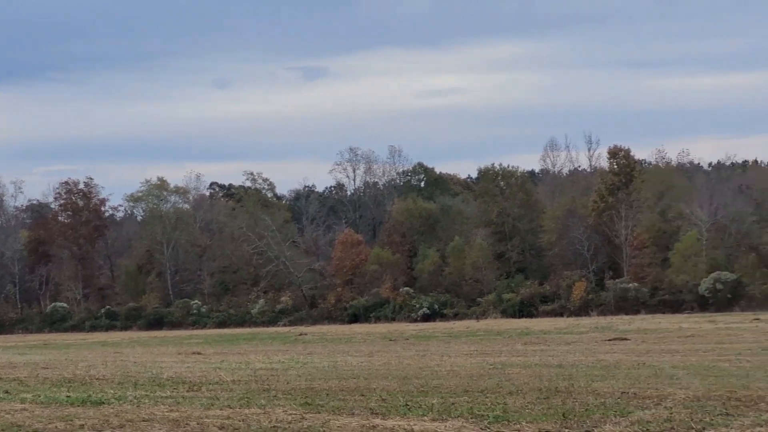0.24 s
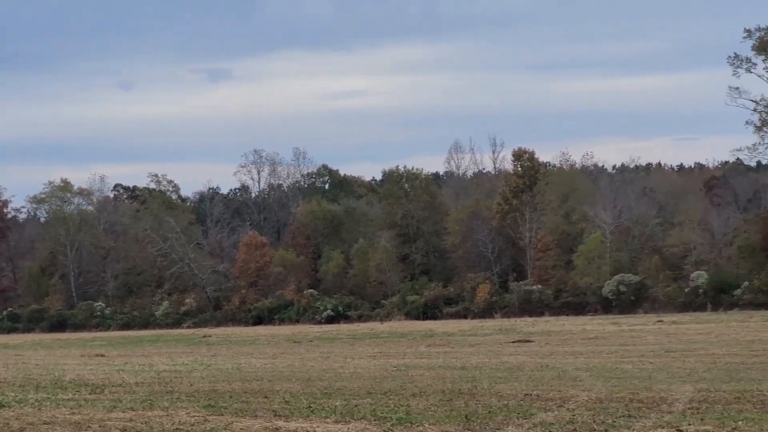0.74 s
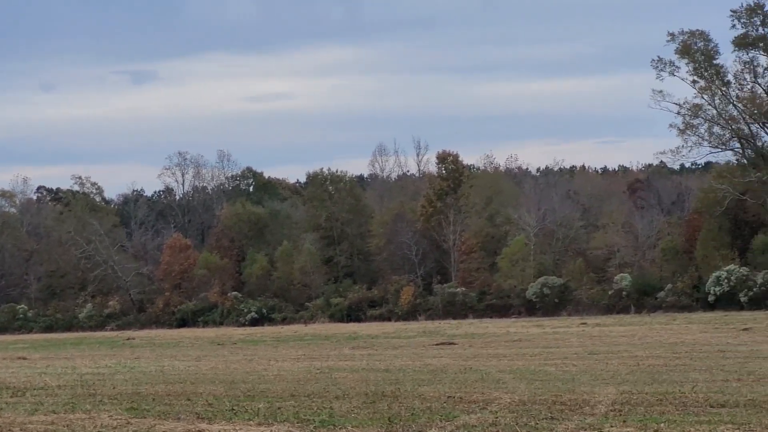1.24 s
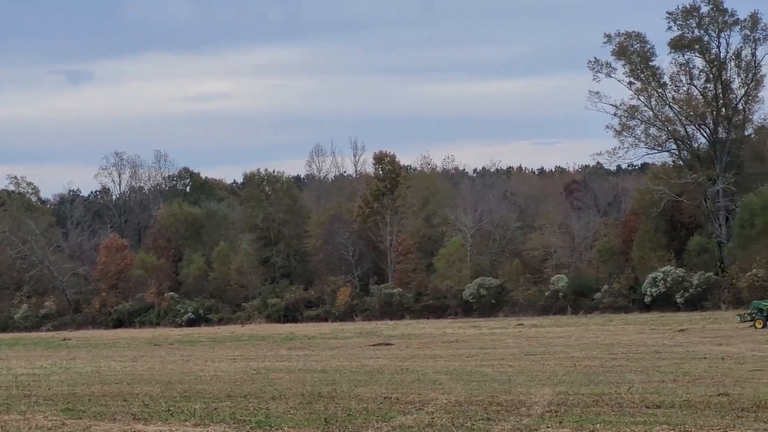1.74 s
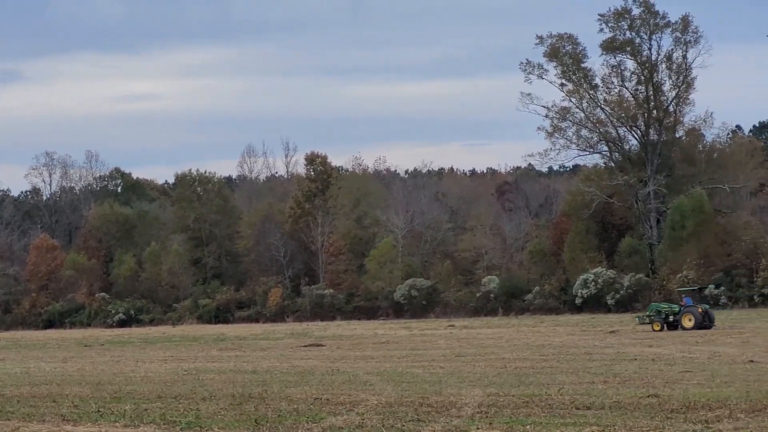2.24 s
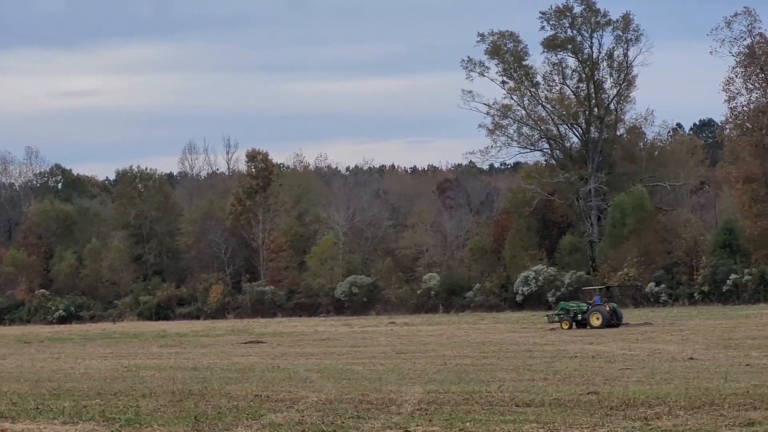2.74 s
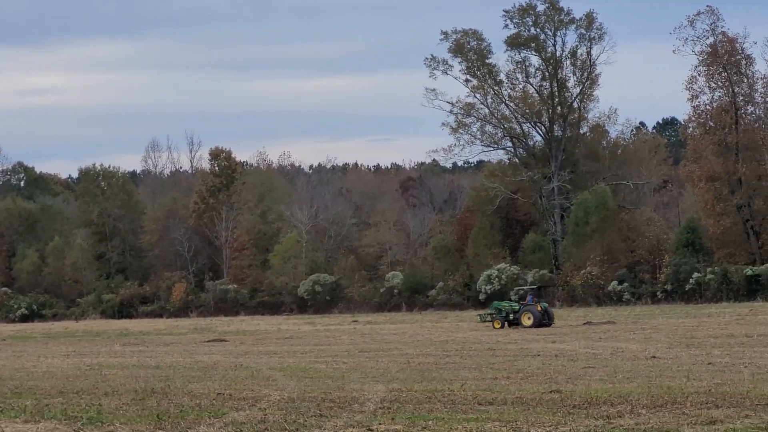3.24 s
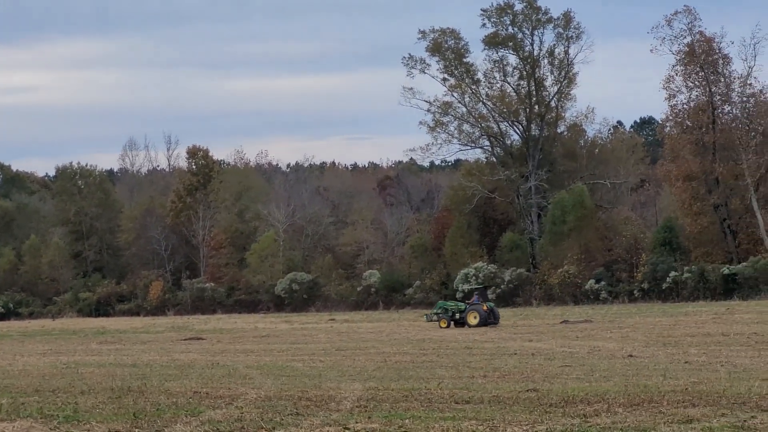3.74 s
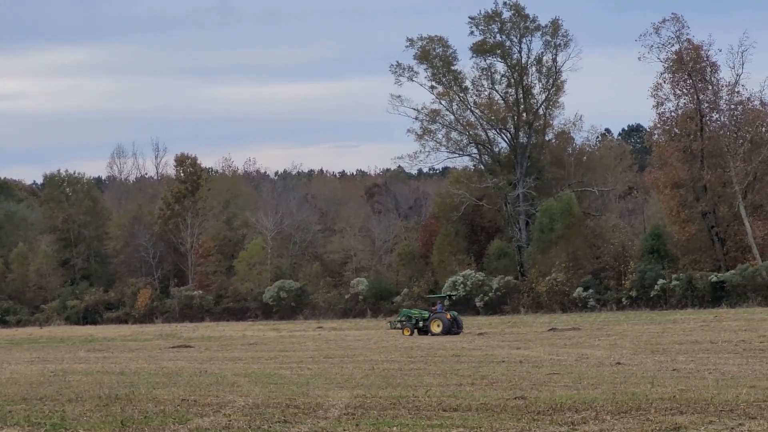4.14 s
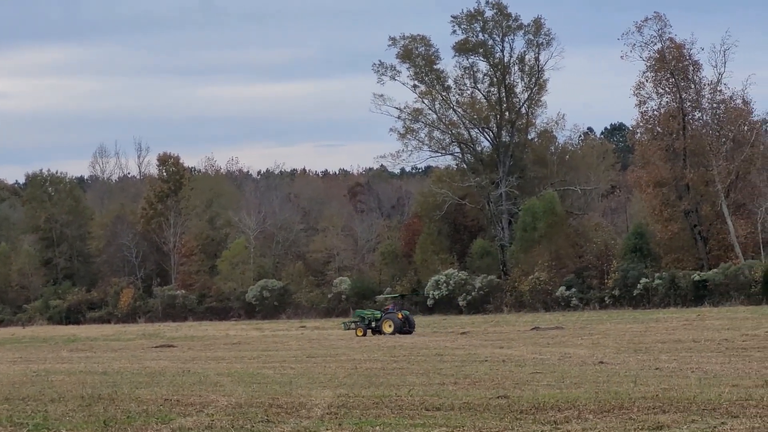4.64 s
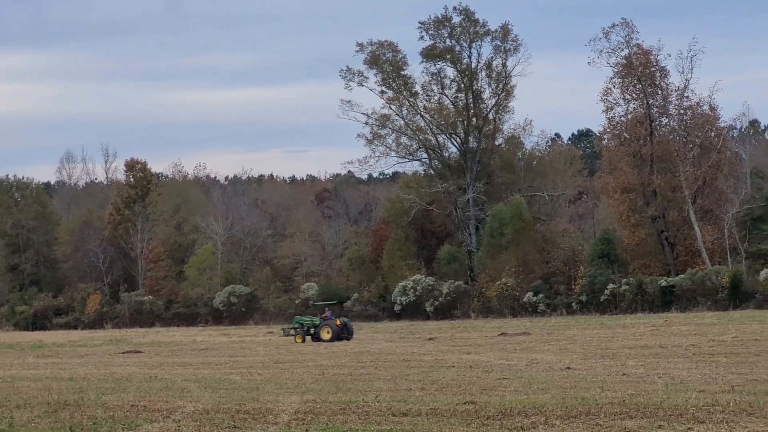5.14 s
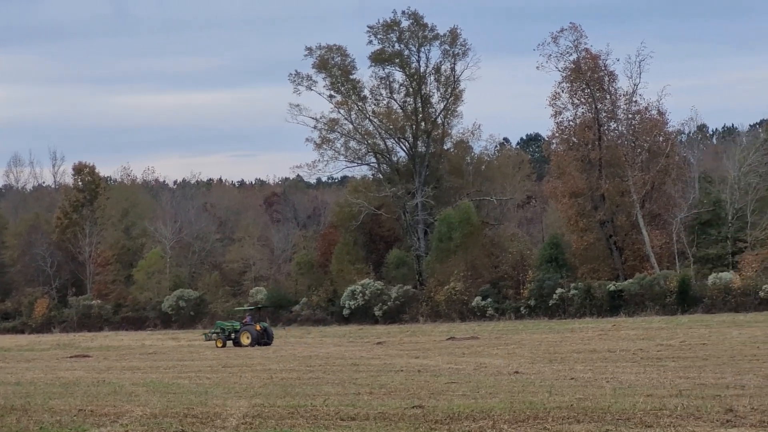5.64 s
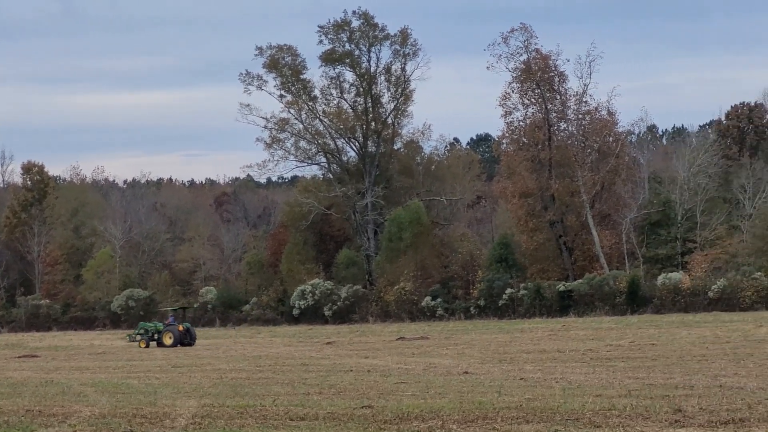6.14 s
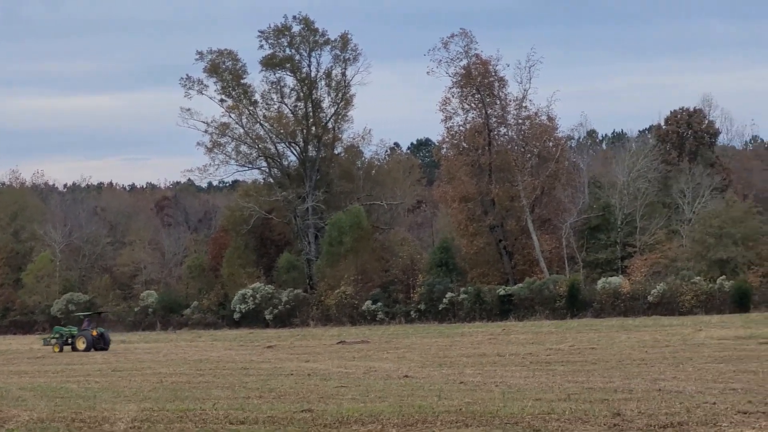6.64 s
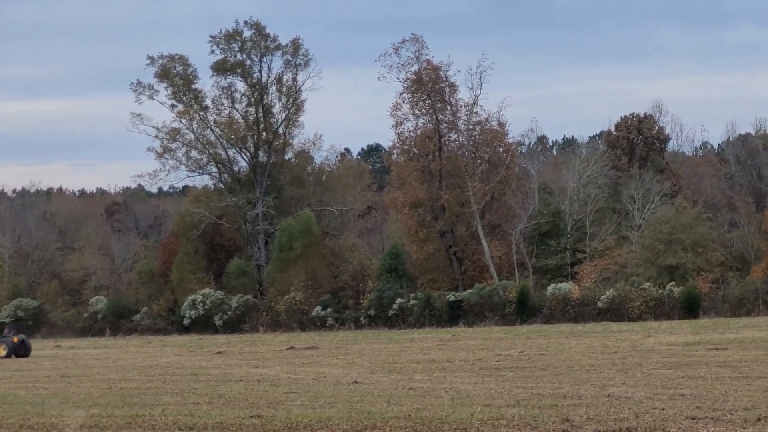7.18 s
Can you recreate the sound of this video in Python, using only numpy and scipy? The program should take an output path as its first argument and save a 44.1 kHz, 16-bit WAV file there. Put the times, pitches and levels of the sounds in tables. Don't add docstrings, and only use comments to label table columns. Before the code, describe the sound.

A distant tractor drones steadily over an open field while dry stubble crunches and snaps nearby, then a cow gives one short closed-mouth low.

```python
import sys
import numpy as np
from scipy import signal
from scipy.fft import rfft, irfft, next_fast_len
from scipy.io import wavfile
from scipy.ndimage import map_coordinates

SR = 44100
rng = np.random.default_rng(int(sys.argv[2]) if len(sys.argv) > 2 else 0)


def put_to_file(sound):
    columns = np.atleast_2d(sound).T
    safe = np.clip(columns, -1, 1)
    whole_steps = np.round(safe * 32767)
    wavfile.write(sys.argv[1], SR, whole_steps.astype(np.int16))


def attenuation_scalar(level_db):
    decades = np.asarray(level_db, float) / 20
    return 10 ** decades


N = 326781
T = np.arange(N) / SR

# (time [s], firing pitch [Hz], firing level [dB])
TRACTOR = [(0.0, 97.1, -39), (0.12, 100.6, -47.5), (0.27, 98.9, -37.5), (0.8, 99.16, -45.5),
           (0.95, 100.4, -40.5), (1.17, 97.2, -42), (1.21, 98.15, -50), (1.52, 97.4, -41),
           (2.37, 96.95, -44), (2.5, 97.7, -47.5), (2.7, 97.1, -40), (3.0, 97.3, -43), (3.71, 97.15, -40.5),
           (5.82, 97.53, -43.5), (6.1, 96.9, -45.5), (6.56, 97.66, -42.5), (6.8, 98.96, -43),
           (7.41, 98.7, -43.5)]
# (multiple of firing pitch, level [dB])
CRANK_ORDERS = [(.5, -49.5), (.64, -58), (.75, -56.5), (1.25, -65.5), (1.5, -60), (2.01, -70.5),
                (2.4, -57.5)]
# (frequency [Hz], density [dB per Hz])
RUMBLE_COLOUR = [(18, -38), (30, -19), (80, -0.5), (104, -8.5), (124, -11), (145, -6.5), (177, -12),
                 (248, -11), (305, -18), (427, -37), (480, -44), (620, -93), (1060, -120)]

# (frequency [Hz], density [dB per Hz])
FIELD_COLOUR = [(240, -58.5), (400, -18), (715, -8), (817, -7.5), (934, -7.5), (1220, -3), (2150, -4),
                (2420, -3), (2650, -1), (2890, -8), (4390, -4.5), (5570, -14.5), (6500, -17), (8000, -14),
                (8700, -48), (10200, -30.5), (14000, -36.5)]
# (centre [Hz], width [Hz], level [dB])
FIELD_BANDS = [(854, 69, 8.5), (1474, 150, 4), (2426, 167, 10.5), (3180, 440, 6.5), (4355, 100, 7)]
# (frequency [Hz], correlation)
FIELD_ALIKE = [(100, 0.89), (350, 0.96), (700, 0.63), (1500, 0.39), (2200, 0.16), (3300, 0.86),
               (4300, 0.21), (6000, 0.033), (7500, 0.034), (15000, 0.11)]

# (time of full weight [s], level [dB], rise [s], t60 [s])
STEPS_NEAR = [(0, -49, .02, 0.57), (.14, -34, .038, 0.25), (.19, -42.5, 0.023, 0.92),
              (.3, -48, 0.032, 0.27), (.51, -53, 0.022, 0.59), (.67, -47.5, 0.047, 0.89),
              (.753, -32.5, 0.029, 0.32), (.86, -42, 0.013, 0.49), (1.045, -46.5, .01, 0.65),
              (1.16, -42, 0.047, 0.26), (1.375, -51, 0.013, 0.33), (1.43, -49.5, 0.027, 1.1),
              (1.497, -33, 0.034, 0.14), (1.74, -51, 0.031, 0.61), (1.87, -48.5, 0.029, 0.17),
              (2.115, -53.5, 0.035, 0.24), (2.19, -57.5, .003, 0.17)]
STEPS_MID = [
    (3.885, -48.5, 0.015, 0.22),
    (3.975, -45, 0.05, 1),
    (4.044, -41.5, 0.054, 0.38),
    (4.156, -56.5, 0.022, 0.54),
]
STEPS_FAR = [
    (5.542, -51, 0.041, 2.5),
    (5.7, -71, .05, 1),
    (6.318, -43, 0.012, 0.082),
    (6.416, -59, .015, 0.43),
    (6.634, -48, 0.038, 0.38),
    (6.728, -48, 0.015, 0.35),
    (6.88, -53.5, 0.039, 0.507),
    (6.952, -38.5, 0.044, 0.52),
    (7.09, -58, 0.024, 1.04),
    (7.332, -51.5, 0.0121, 0.35),
]
# (frequency [Hz], density [dB per Hz])
STALKS_NEAR = [(260, -1), (450, -23), (789, -11.5), (1050, -16), (1300, -4), (1740, -13.5), (1980, -0.5),
               (3090, -1), (3370, -1), (3670, -2.5), (4900, -9.5), (5740, -16.5), (7440, -19.5),
               (12800, -42.5), (14000, -62)]
STALKS_MID = [(350, -35), (600, -15.5), (845, -12.5), (1510, -10.5), (1610, -1.5), (1820, -14), (2020, -6),
              (2490, -4.5), (2700, -6), (3950, -0.5), (6100, -19), (7940, -16), (14000, -59)]
STALKS_FAR = [(260, -62), (450, -26), (800, -15), (964, -21), (1320, -10.5), (1740, -11), (2100, -3),
              (2490, -7), (2920, -4), (4120, -4), (7880, -28.5), (11600, -36), (14000, -72)]
# (centre [Hz], width [Hz], level [dB])
HOLLOW_NEAR = [(784, 27, 11.5), (1638, 67, 13.5), (1910, 100, 5), (2770, 21, 12), (3050, 18, 12.5),
               (3705, 98, 8), (4930, 180, 12.5), (7500, 2100, 4.5)]
HOLLOW_FAR = [(820, 100, 3), (2360, 100, 3), (2900, 500, 6), (3330, 150, 3), (3770, 90, 4), (4680, 100, 3)]
# (time [s], peak level [dB], ring [Hz])
SNAPS = [(0.03, -36, 3100), (0.107, -32, 3830), (0.1221, -27, 1970), (0.124, -26, 3780),
         (0.1414, -25.5, 3180), (0.198, -35, 3700), (0.299, -33, 3000), (0.7348, -37, 1920),
         (0.7403, -19.5, 3010), (0.7544, -22, 3730), (0.766, -31, 3000), (0.783, -25, 3150),
         (0.799, -34, 3600), (0.814, -28, 2900), (0.858, -29.5, 2620), (1.3713, -46, 2012),
         (1.4666, -36, 3564), (1.4738, -33.5, 2830), (1.4927, -37, 2256), (1.501, -37, 3570),
         (1.524, -55, 3020), (1.739, -48, 3060), (1.8644, -36.5, 3500), (2.109, -37.5, 3050),
         (2.1879, -35, 3566), (3.875, -39, 4180), (3.949, -36, 4700), (3.9706, -33, 3930),
         (3.9935, -37.5, 3870), (4.013, -32, 3990), (4.0481, -39, 3900), (4.074, -40.5, 3936),
         (4.117, -46, 2896), (4.1615, -41, 3450), (4.1758, -37, 3520), (4.2, -42, 3900),
         (4.804, -38.5, 2908), (5.7136, -44, 2390), (6.313, -40, 2770), (6.633, -34, 2860),
         (6.7251, -33.5, 2800), (6.913, -30, 3284), (6.935, -30, 2770), (6.949, -30, 3000),
         (6.958, -31, 2900), (6.978, -34, 3006), (7.3282, -35, 3350)]
# (time [s], level [dB])
THUDS = [
    (0.081, -37),
    (0.741, -49),
    (4.485, -47),
    (5.527, -31),
    (6.93, -44),
]
# (time [s], length [s], level [dB], low edge [Hz], high edge [Hz])
SWEEPS = [
    (4.77, 0.16, -68, 3000, 14000),
    (5.716, 0.24, -52.5, 970, 2700),
    (7.405, 0.034, -40.5, 300, 1200),
    (5.504, 0.45, -74, 5986, 12900),
    (5.685, 0.037, -64, 5000, 13800),
    (6.48, 0.02, -64.5, 4000, 12900),
    (6.57, 0.041, -71, 6000, 14000),
]
# (time [s], peak level [dB], pitch [Hz], t60 [s])
CHINKS = [
    (.503, -40, 4820, .07),
    (1.04, -32, 4830, .09),
    (1.065, -38, 4830, .07),
    (1.152, -37, 4830, .08),
    (1.495, -36, 4830, .1),
    (1.598, -39, 4750, .08),
    (2.886, -42, 4900, .02),
    (3.625, -43, 5000, .02),
    (5.188, -43, 4700, .02),
]

# (time [s], length [s], pitch [Hz], rise [Hz], level [dB])
CHIPS = [
    (2.505, .075, 5580, 170, -58),
    (3.345, .07, 5280, 0, -49),
    (3.55, .05, 5300, 0, -51),
    (3.785, .08, 5270, 40, -50),
]

# (time [s], effort [dB], air through the nose [dB])
LOW = [
    (3.32, -62, -33),
    (3.362, -44, -8.5),
    (3.44, -46, -1),
    (3.55, -36.5, -7),
    (3.68, -33, -10.5),
    (3.82, -32, -10),
    (3.89, -29.5, -13.5),
    (3.912, -37.5, -11),
    (3.945, -72, -9),
]
# (time [s], pitch [Hz])
PITCH = [
    (3.33, 113.5),
    (3.4, 119.8),
    (3.492, 123),
    (3.59, 124),
    (3.63, 125.9),
    (3.722, 128.6),
    (3.812, 129),
    (3.862, 127.4),
    (3.89, 123),
    (3.925, 112),
]
# (centre [Hz], width [Hz], level [dB])
CHEST = [(233.6, 91, 21), (515, 40, -30)]
NOSE = [(872, 115, 0)]
SINUS = [(1137, 154, 0)]
PALATE = [(1480, 233, 0)]
BROW = [(1712, 170, 0)]
HEAD = [(1962, 165, 7.5), (2390, 142, 0), (2556, 260, 1)]
# (level [dB], opening [dB per s], gain at a push [dB])
UPPER = [
    (-4.5, 15, -4),
    (-4.5, 6, 4),
    (-10.5, 22.5, -12),
    (-5.5, -1, 6.5),
]
# (centre [Hz], width [Hz], level [dB])
NASAL_BUMPS = [(1063, 47, 5), (1240, 78, -3)]

# (frequency [Hz], left minus right [dB])
FIELD_PORTS = ([(0, 0), (1100, -1.6), (1700, 3), (2200, 9), (2700, 9.5), (4000, 26), (5100, 28),
                (7500, 40.5), (9000, 44)], [(500, 0), (770, -2.5), (1500, -1.5), (2740, -4), (4190, 0),
                (6410, 0), (9810, 1), (15000, 4.5)])
NEAR_PORTS = ([(0, 0), (1100, .6), (1300, -.3), (1700, 1), (1900, -.5), (2300, .4), (2600, 6), (4300, 26),
               (5200, 30), (9000, 44)], [(60, .5), (330, -1), (500, 1.5), (770, -2.5), (1400, -.5),
               (2740, -2.5), (4190, 1.5), (9810, 2.5), (15000, 7.5)])
MID_PORTS = ([(0, 0), (2000, 1), (2600, 6), (4300, 26), (5200, 30), (9000, 44)], [(380, -.5), (700, -4),
              (1290, 0), (2380, -1.5), (4400, 2.5), (8120, 1), (15000, 6.5)])
FAR_PORTS = ([(0, 0), (1000, .6), (1700, 3), (1900, 1.7), (2600, 9.4), (4400, 28), (5200, 30), (9000, 40)],
              [(330, 0), (500, 2), (770, -3.5), (1170, -1), (2740, -5), (6410, 2.5), (9810, 1.5),
              (15000, 9)])
COW_PORTS = ([(0, 0), (400, .5), (800, 1.8), (1100, 3), (1600, 5), (1800, 4.4), (2200, 6.6), (3000, 7.5)],
              [(300, .5), (700, 3), (900, -1), (1150, -9), (1500, -4), (1650, -1), (1900, -12), (2200, -6),
              (2500, -5)])


def unit(x):
    return x / np.sqrt(np.mean(x ** 2) + 1e-20)


def along(points, hz):
    f, v = np.transpose(points)
    return np.interp(np.log(hz + 1), np.log(f + 1), v)


def curves(rows):
    s, *cols = np.transpose(rows)
    return [np.interp(T, s, c) for c in cols]


def during(rows, fade):
    return np.clip(np.minimum(T - rows[0][0], rows[-1][0] - T) / fade + 1, 0, 1)


def wobble(rate):
    return map_coordinates(rng.standard_normal(int(N * rate / SR) + 4), [T * rate])


def add(out, s, x):
    spot = out[..., round(s * SR):][..., :x.shape[-1]]
    spot += x[..., :spot.shape[-1]]


def filtered(x, response):
    m = next_fast_len(N + SR // 4)
    return irfft(rfft(x, m) * response(np.fft.rfftfreq(m, 1 / SR)), m)[..., :N]


def resonant(modes):
    def response(f):
        total = 0
        for k, (c, w, db) in enumerate(modes):
            total = total + (-1) ** k * attenuation_scalar(db) * 1j * f * w / (c * c - f * f + 1j * f * w)
        return total
    return response


def bumps(bands):
    return lambda f: attenuation_scalar(sum(db / (1 + (2 * (f - c) / w) ** 2) for c, w, db in bands))


def ports(x, where):
    lead, balance = where

    def half(hz):
        return attenuation_scalar(along(balance, hz) / 2) * np.exp(.5j * np.interp(hz, *np.transpose(lead)))
    return filtered(x, lambda hz: np.array([half(hz), 1 / half(hz)]))


def pair(noise, alike):
    def mid_and_side(hz):
        turn = np.arccos(np.clip(alike(hz), -1, 1)) / 2
        return np.array([np.cos(turn), np.sin(turn)])
    mid, side = filtered(noise, mid_and_side)
    return np.array([mid + side, mid - side])


def far_noise():
    return pair(rng.standard_normal((2, N)), lambda hz: along(FIELD_ALIKE, hz))


def tractor():
    firing, firing_db = curves(TRACTOR)
    phase = 2 * np.pi * np.cumsum(firing) / SR
    tone = attenuation_scalar(firing_db + 3.5 + 0.85 * wobble(9)) * np.sin(phase + 0.17 * wobble(9.7))
    for k, db in CRANK_ORDERS:
        tone += attenuation_scalar(db + 0.5 + 1.5 * wobble(6)) * np.sin(k * phase + 0.77 * wobble(5))
    rumble = unit(filtered(far_noise(), lambda hz: attenuation_scalar(along(RUMBLE_COLOUR, hz))))
    throb = 1 + 0.18 * np.cos(phase / 4)
    return tone + attenuation_scalar(-47.0 + 1.12 * wobble(8.3)) * throb * rumble


def field():
    start_db, fade_db_per_s = -51, 0.44
    air = unit(filtered(far_noise(), lambda hz: attenuation_scalar(along(FIELD_COLOUR, hz)) * bumps(FIELD_BANDS)(hz)))
    unrest_db = .4 * wobble(8) + .9 * wobble(40)
    return ports(attenuation_scalar(start_db - fade_db_per_s * T + unrest_db) * air, FIELD_PORTS)


def insects():
    chorus_db, hushed_db, recovery_s = -81, -22, 1.8
    beat = 2 * np.pi * np.cumsum(46.8 + .3 * wobble(1)) / SR
    strokes = (.5 + .5 * np.cos(beat)) ** 1.5 * (.6 + .4 * np.cos(4 * beat))
    wing = resonant([(7600, 420, 0)])
    trill = unit(filtered(strokes * rng.standard_normal(N), lambda f: wing(f) ** 2))
    hiss = unit(filtered(rng.standard_normal((2, N)), lambda f: resonant([(15200, 1100, 0)])(f) ** 3))
    hiss_db = chorus_db + hushed_db * np.exp(-T / recovery_s) + 2.2 * wobble(60) + 5 * np.cos(beat)
    chorus = attenuation_scalar(hiss_db + [[4], [-2]]) * hiss
    return ports(attenuation_scalar(-63.5 + 2.8 * wobble(1.45)) * trill, FIELD_PORTS) + chorus


def treading(steps, faster):
    rise_db, touch_s, settle_db, settle_s = 6.5, 0.002, -11.5, 1.8
    power = np.zeros(N)
    for s, db, rise, t60 in steps:
        at = max(int((s - rise) * SR), 0)
        t = T[at:at + 2 * SR] - s
        dying = attenuation_scalar(-60 * faster * np.abs(t) / max(t60, .02))
        settling = attenuation_scalar(settle_db - 60 * faster * np.abs(t) / settle_s)
        climb = attenuation_scalar(rise_db * np.minimum(t, 0) / max(rise, .002)) * np.clip((t + rise) / touch_s, 0, 1)
        power[at:at + 2 * SR] += (attenuation_scalar(db) * np.where(t < 0, climb, dying + settling)) ** 2
    return np.sqrt(power)


def crackle(steps, colour, hollow, where, spiky_db, bright_db):
    split_hz, treble_faster = 5800, 1.62
    clumps_db = .7 * wobble(70) + 1.7 * np.clip(wobble(200), -3, 1.6)
    size = attenuation_scalar(spiky_db * rng.exponential(size=N) + clumps_db)
    size *= 1 + 1.2 * (rng.random(N) < 250 / SR)
    breaks = pair(size * rng.standard_normal((2, N)), lambda hz: np.full_like(hz, .7))
    breaks = filtered(breaks, bumps(hollow))
    low = unit(filtered(breaks, lambda hz: attenuation_scalar(along(colour, hz)) * (hz < split_hz)))
    high = unit(filtered(breaks, lambda hz: attenuation_scalar(along(colour, hz)) * (hz >= split_hz)))
    crunch = treading(steps, 1) * low + attenuation_scalar(bright_db) * treading(steps, treble_faster) * high
    return ports(attenuation_scalar(0.5) * crunch, where)


def stalk_snaps():
    ring_t60_s, crack_t60_s = 0.066, 0.061
    edge_db, edge_t60_s, edge_low_hz = -19.5, 0.0097, 5870
    out, t = np.zeros(N + SR), T[:SR // 5]
    crack = unit(filtered(rng.standard_normal(N), lambda hz: attenuation_scalar(along(STALKS_NEAR, hz))))
    shake = .8 * wobble(150)

    def edge_colour(hz):
        return (hz > edge_low_hz) * (hz < 13000) * (edge_low_hz / (hz + 1)) ** 2.3
    edge = unit(filtered(rng.standard_normal(N), edge_colour))
    for s, db, hz in SNAPS:
        start = round(s * SR) % (N - SR)
        here = slice(start, start + len(t))
        ring = np.sin(2 * np.pi * hz * t + shake[here]) * attenuation_scalar(-60 * t / ring_t60_s)
        burst = 0.71 * crack[here] * attenuation_scalar(-60 * t / crack_t60_s)
        burst += edge[here] * attenuation_scalar(edge_db - 60 * t / edge_t60_s)
        add(out, s, attenuation_scalar(db - 6) * (0.92 * ring + burst) * (1 - np.exp(-t / 0.0002)))
    return out[:N]


def hooves():
    hollow_mid = [(1990, 100, 13.0), (2330, 130, 11.0), (4900, 350, 12.0)]
    near = crackle(STEPS_NEAR, STALKS_NEAR, HOLLOW_NEAR, NEAR_PORTS, spiky_db=1, bright_db=-15)
    mid = crackle(STEPS_MID, STALKS_MID, hollow_mid, MID_PORTS, spiky_db=1.5, bright_db=-12.5)
    far = crackle(STEPS_FAR, STALKS_FAR, HOLLOW_FAR, FAR_PORTS, spiky_db=2.5, bright_db=-16)
    snaps, early = stalk_snaps(), T < 3
    return near + mid + far + ports(snaps * early, NEAR_PORTS) + ports(snaps * ~early, FAR_PORTS)


def thuds():
    out, t = np.zeros(N), T[:SR // 5]
    for s, db in THUDS:
        add(out, s, attenuation_scalar(db - 60 * t / 0.11) * np.sin(2 * np.pi * 220 * t) * (1 - np.exp(-t / 0.0027)))
    return out


def fence():
    out, t = np.zeros(N), T[:SR // 5]
    for s, db, hz, t60 in CHINKS:
        tones = np.sin(2 * np.pi * hz * t) + .5 * np.sin(2.03 * np.pi * hz * t)
        tones += .04 * np.sin(4 * np.pi * hz * t)
        add(out, s, attenuation_scalar(db - 75 * t / t60) * tones * (1 - np.exp(-t / .001)))
    return out * attenuation_scalar([[-4], [-8]])


def bird():
    out, waver_hz, flutter_db = np.zeros(N), 45 * wobble(150), 3 * wobble(90)
    for s, length, hz, rise, db in CHIPS:
        u = T[:round(length * SR)] / length
        here = slice(round(s * SR), round(s * SR) + len(u))
        pitch = hz + rise * np.sqrt(u) + waver_hz[here]
        swell = attenuation_scalar(db + flutter_db[here]) * np.sin(np.pi * u ** 0.57) ** 0.41
        add(out, s, swell * np.sin(2 * np.pi * np.cumsum(pitch) / SR))
    return ports(out, FIELD_PORTS)


def vocal_folds(catch_s):
    phase = 2 * np.pi * np.cumsum(curves(PITCH)[0] * (1 + .003 * wobble(40))) / SR
    pulses = unit(sum(np.cos(k * phase) for k in range(1, 25)))
    catch_rasp = np.exp(-((T - catch_s) / 0.014) ** 2)
    end_rasp = .6 * np.exp(-((T - 3.9) / .022) ** 2)
    breath = (.08 + end_rasp + catch_rasp) * (1 + np.cos(phase)) * rng.standard_normal(N)
    return attenuation_scalar(1.46 * wobble(30)) * pulses + breath


def tree_line(x):
    t60_s, echo_db = 0.27, -14
    tail = rng.standard_normal((2, SR // 3)) * attenuation_scalar(-60 * T[:SR // 3] / t60_s)
    return attenuation_scalar(echo_db) * signal.fftconvolve(x[None], tail / np.linalg.norm(tail[0]), axes=1)[:, :N]


def cow():
    catch_s, last_push_s, relax_s = 3.59, 3.82, 0.032
    source = vocal_folds(catch_s)

    def closed_mouth(f):
        return (385 ** 2 - f * f + 20j * f) / (385 ** 2 - f * f + 300j * f)

    def cavity(modes, db):
        ringing = unit(filtered(source, lambda f: resonant(modes)(f) ** 2 * closed_mouth(f)))
        return on * attenuation_scalar(db + 1.1 * wobble(14)) * ringing

    on = during(LOW, fade=0.038)
    effort_db, air_db = curves(LOW)
    nose_db = effort_db + air_db
    since = np.clip(T - [[catch_s], [last_push_s]], 0, 1) / relax_s
    push = np.e * np.sum(since * np.exp(-since), axis=0)
    upper = cavity(NOSE, nose_db)
    for modes, (db, opening, gain) in zip((SINUS, PALATE, BROW, HEAD), UPPER):
        upper += cavity(modes, nose_db + db + opening * (T - LOW[1][0]) + gain * push)
    upper = filtered(upper, lambda f: 1 / (1 + (750 / (f + 1)) ** 9))
    upper = filtered(upper, bumps(NASAL_BUMPS))
    chest = filtered(cavity(CHEST, effort_db), lambda f: 1 / (1 + (f / 680) ** 4))
    return ports(chest + upper, COW_PORTS) + tree_line(upper)


def tail_sweeps():
    out = np.zeros((2, N))
    for s, length, db, low_hz, high_hz in SWEEPS:
        band = signal.butter(2, [low_hz, high_hz], "bandpass", fs=SR, output="sos")
        brush = unit(signal.sosfilt(band, rng.standard_normal((2, SR // 2))))
        add(out, s, attenuation_scalar(db) * np.sin(np.pi * np.clip(T[:SR // 2] / length, 0, 1)) * brush)
    return out


def scene():
    return tractor() + field() + insects() + hooves() + thuds() + fence() + bird() + cow() + tail_sweeps()


def band_limit(x):
    return signal.sosfilt(signal.butter(12, 17050, fs=SR, output="sos"), x)


def record(dry):
    limited = filtered(dry, lambda hz: hz < 15830)
    return band_limit(limited)


dry = scene()
out = record(dry)
put_to_file(out)
```